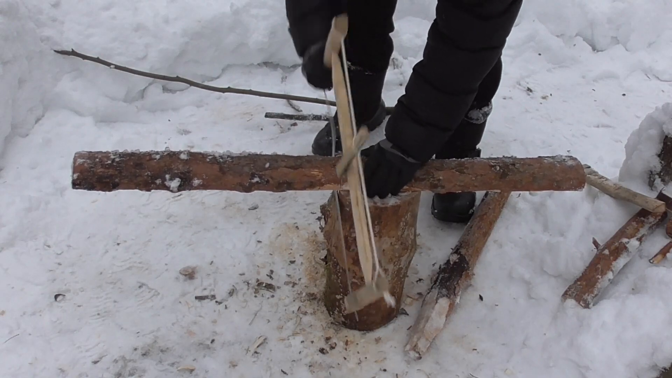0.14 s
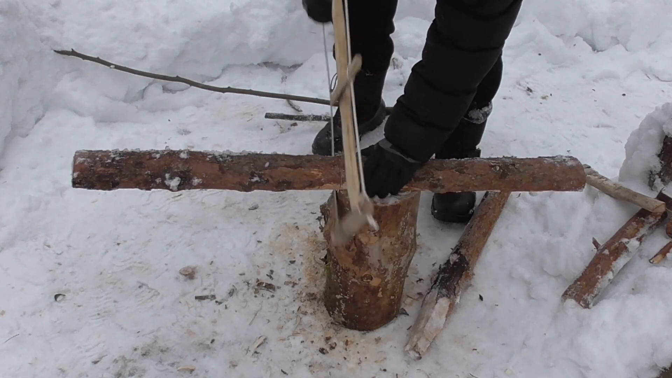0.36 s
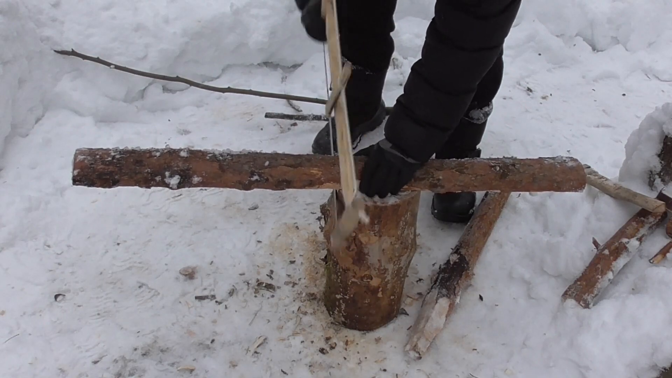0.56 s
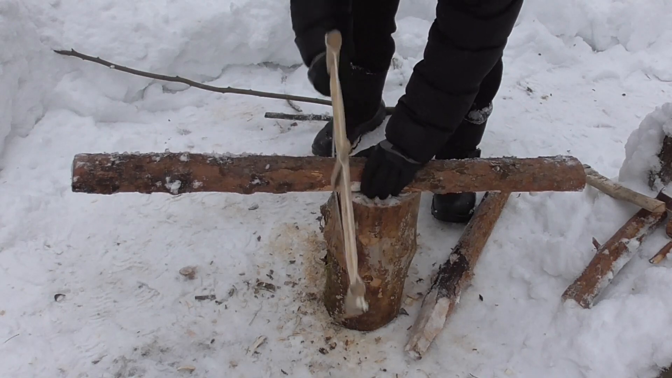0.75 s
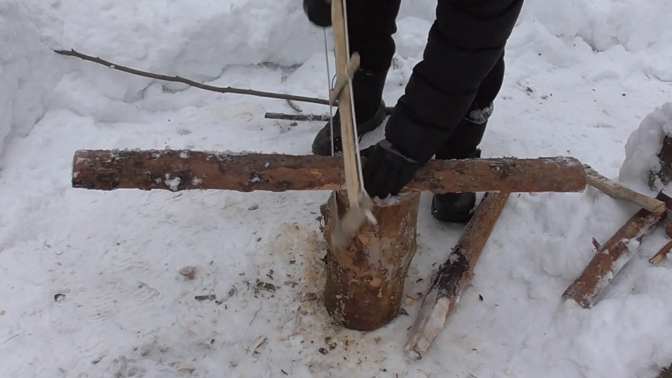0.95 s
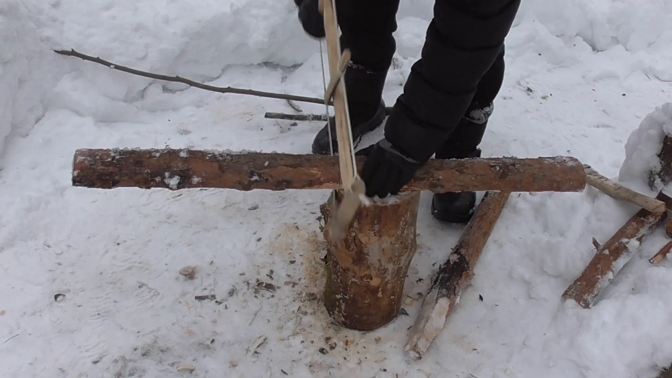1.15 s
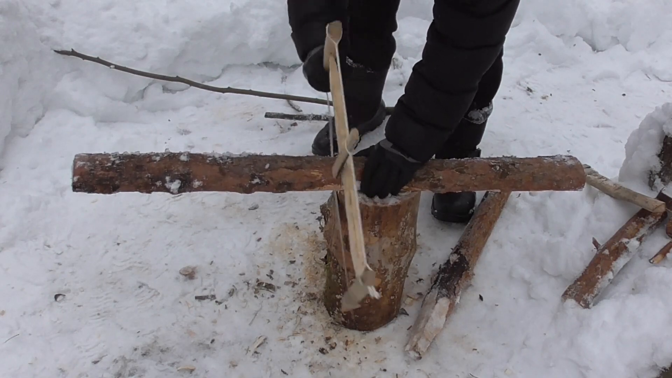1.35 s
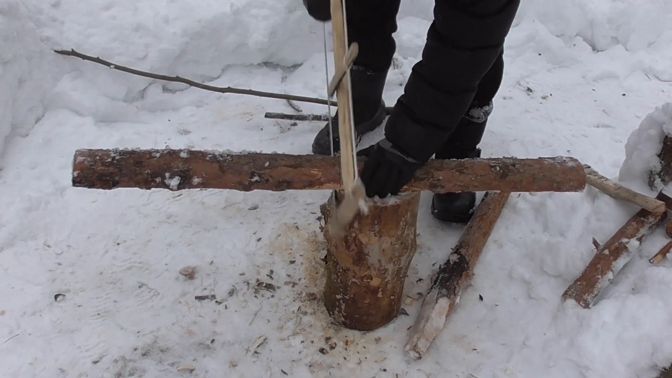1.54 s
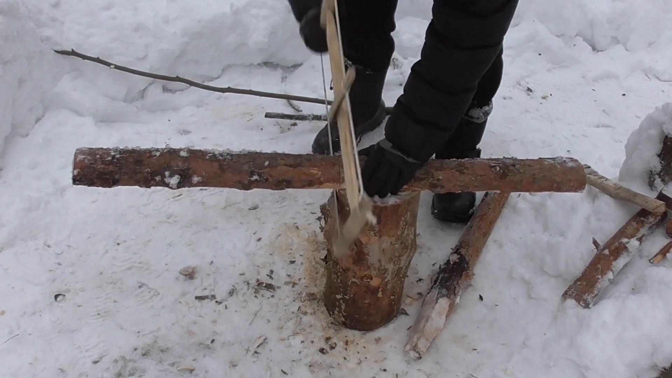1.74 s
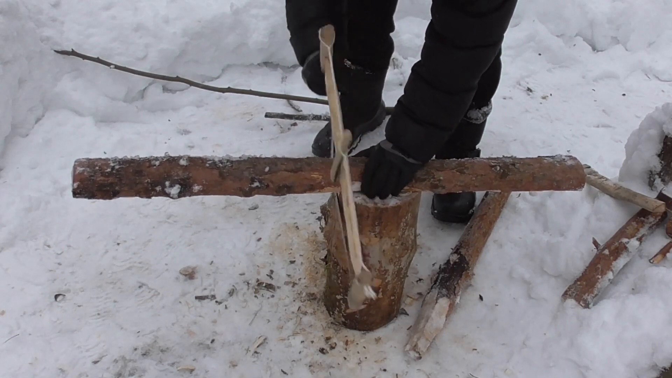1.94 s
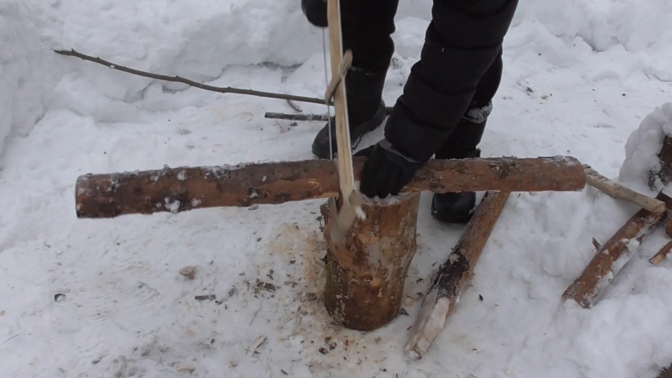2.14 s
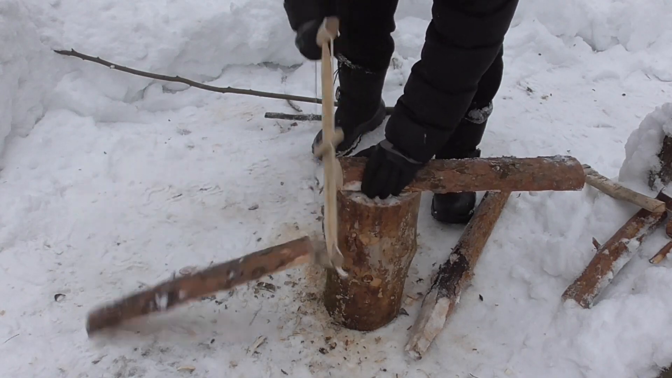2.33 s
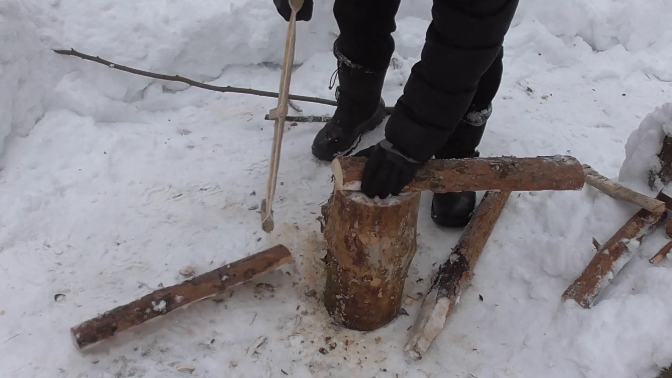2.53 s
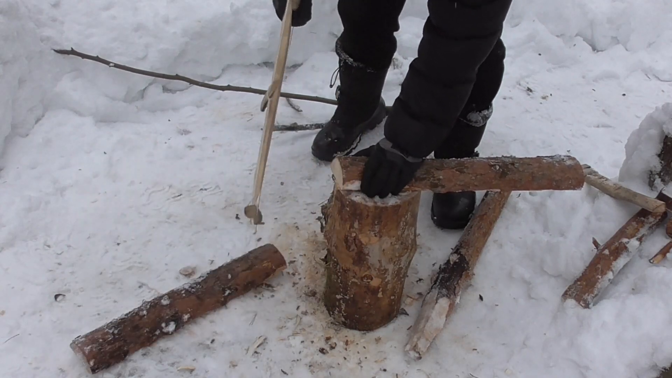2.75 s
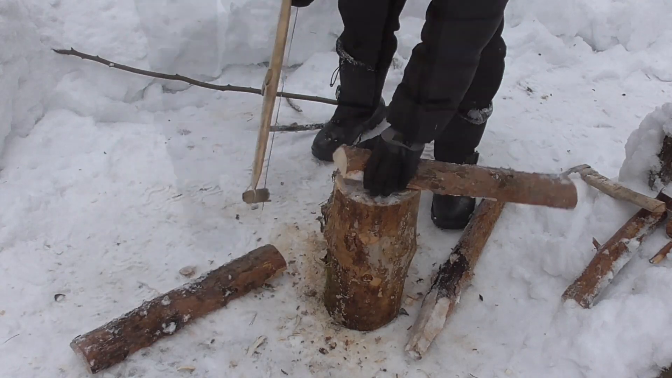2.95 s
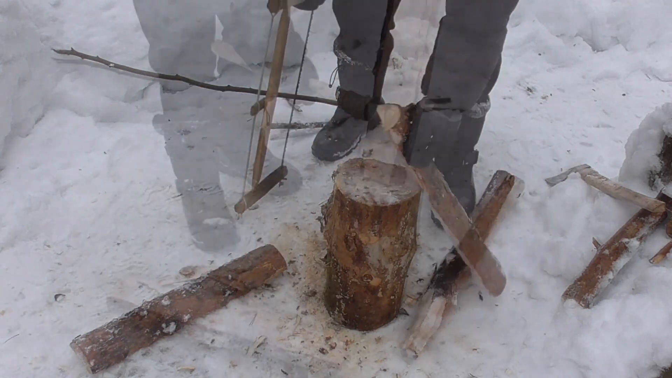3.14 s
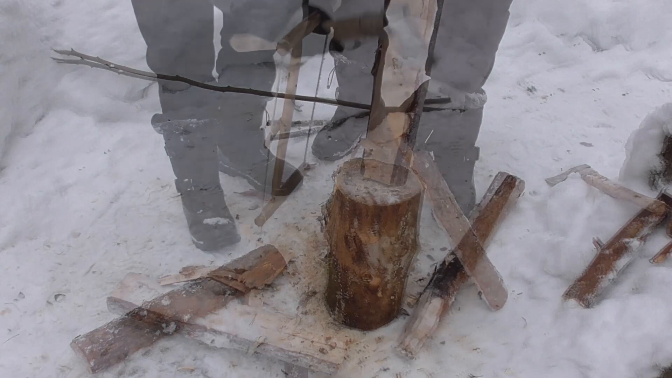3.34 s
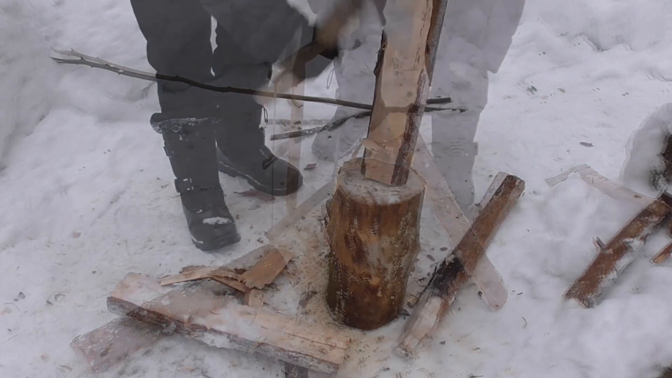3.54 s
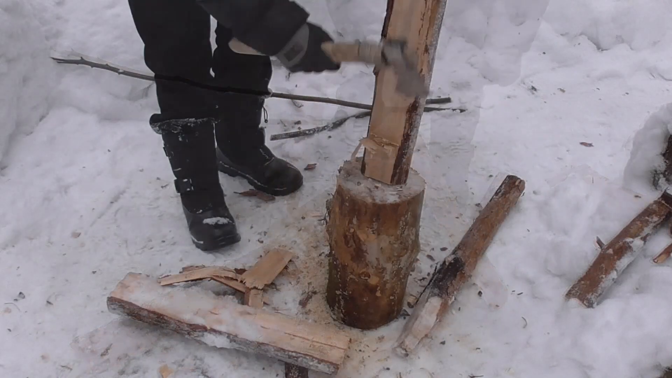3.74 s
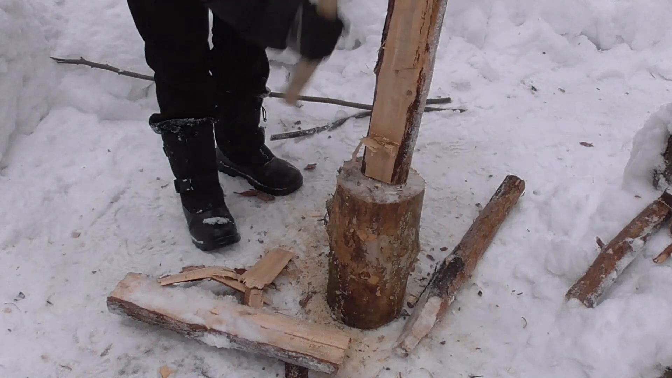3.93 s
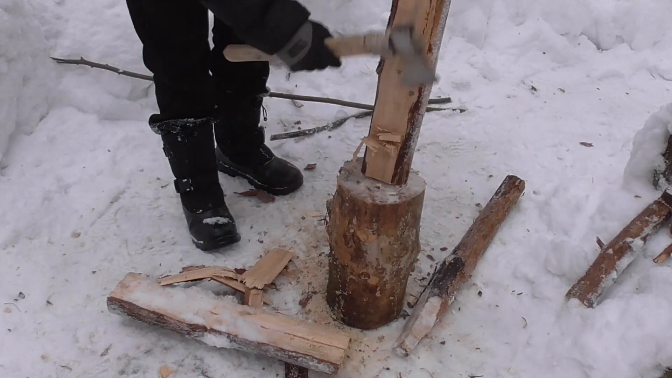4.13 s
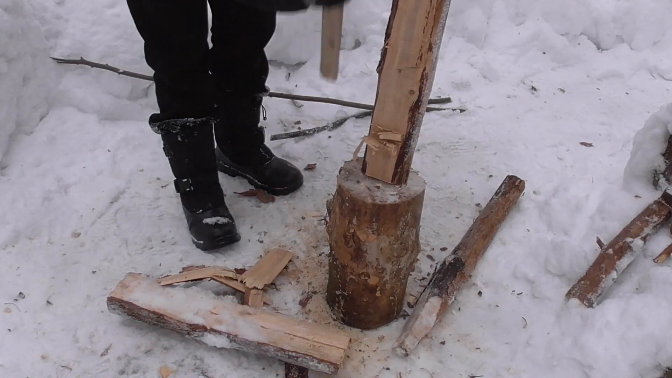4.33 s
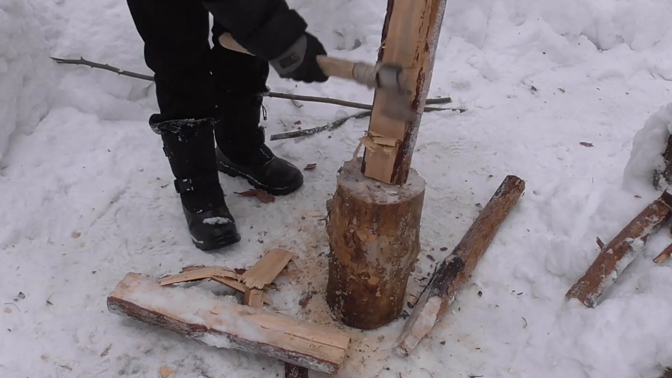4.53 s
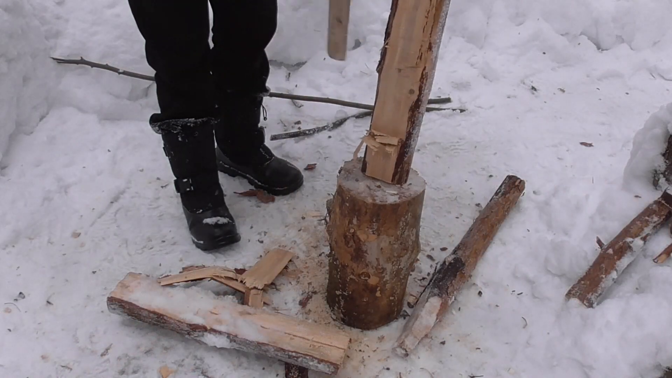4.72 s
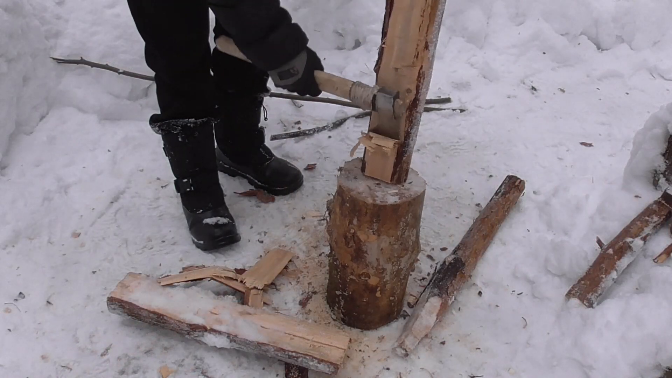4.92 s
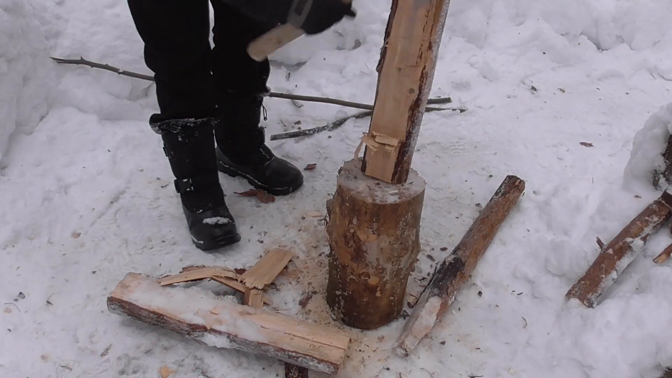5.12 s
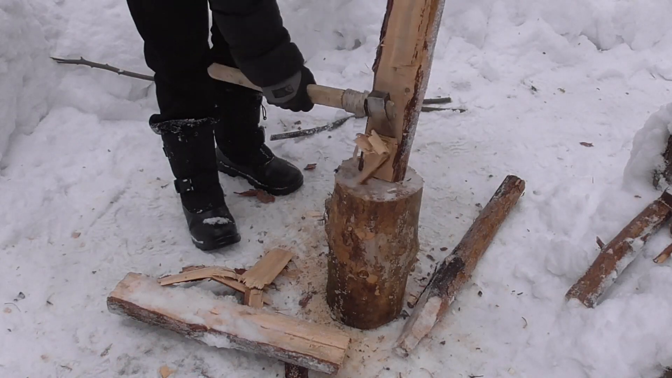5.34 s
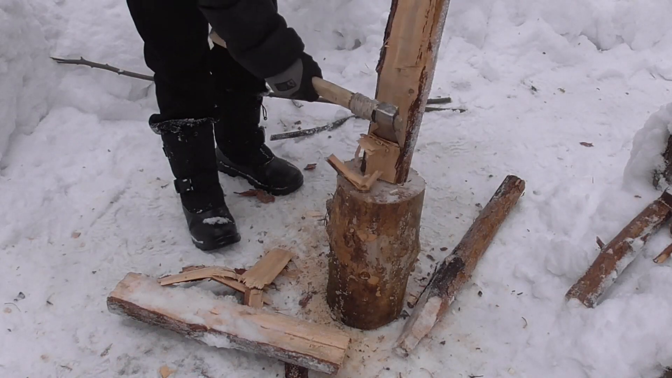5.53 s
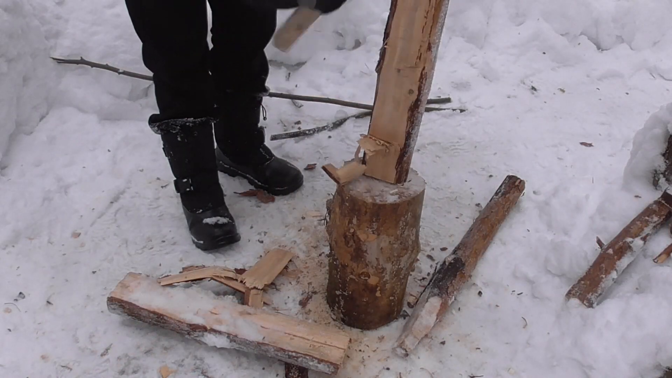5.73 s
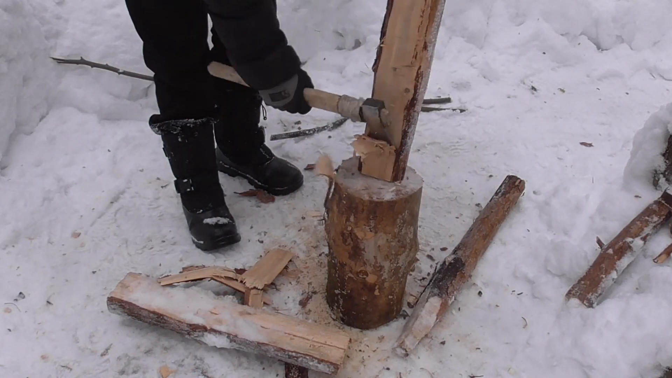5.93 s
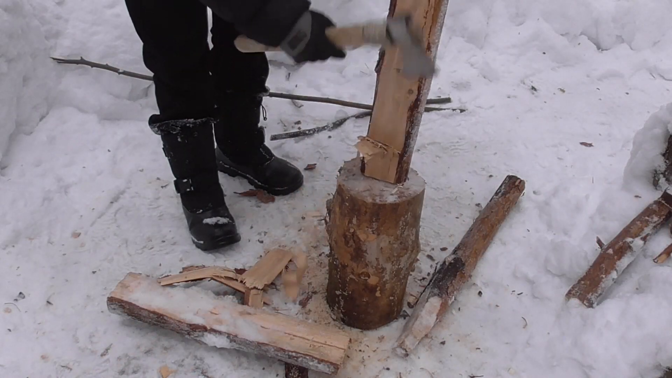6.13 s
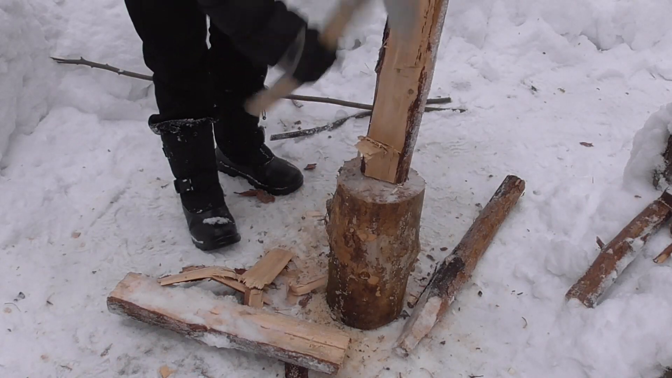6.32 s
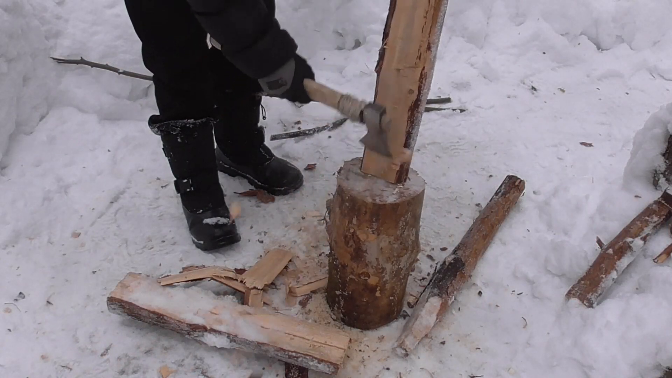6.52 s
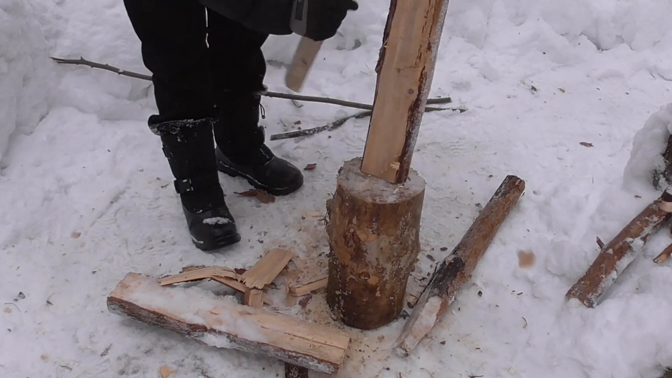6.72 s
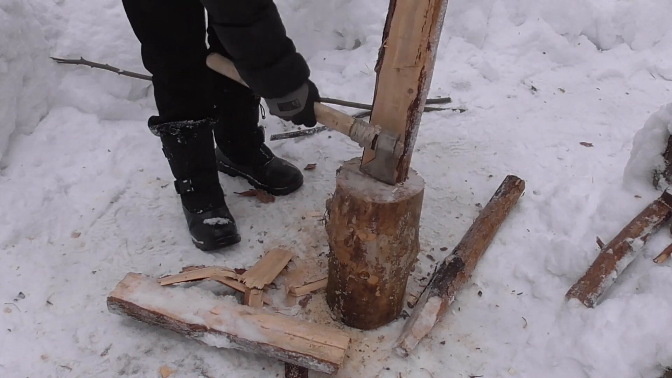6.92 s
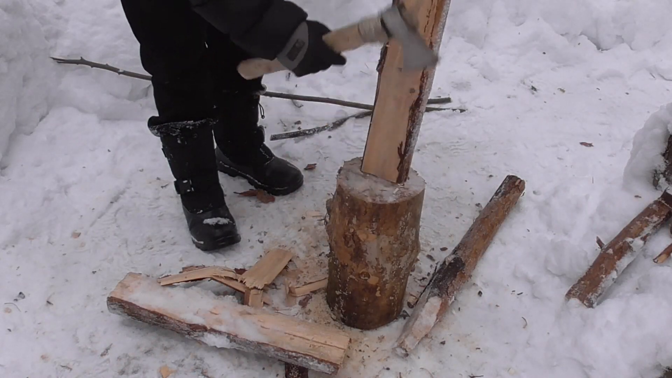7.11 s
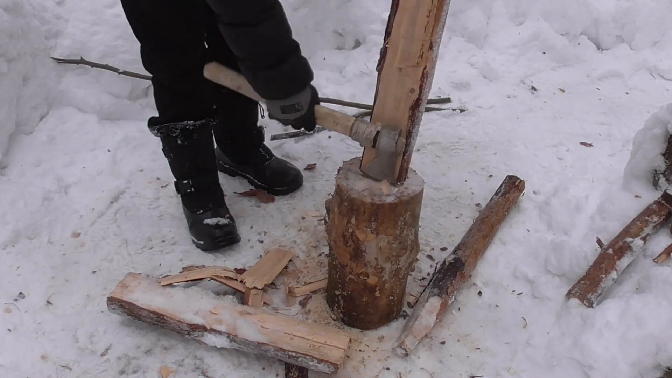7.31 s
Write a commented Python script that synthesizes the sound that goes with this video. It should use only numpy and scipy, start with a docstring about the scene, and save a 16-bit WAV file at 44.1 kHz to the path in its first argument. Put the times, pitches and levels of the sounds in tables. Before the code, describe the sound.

Heard from a few metres in a quiet, snowy forest, a hand saw cuts a log with fast, gritty back-and-forth strokes. The wood splinters and breaks, and the piece drops with a knock and a crunch of snow. Wood is bumped about, then a hatchet strikes a board on a block eight times at an even pace. The chops are sharp and nearly dry, with a faint distant echo, small falling chips and soft clothing rustle.

```python
"""A bow saw rasps through a log in quick pulls and pushes, its teeth shaking wood, frame and blade.
The last fibres snap, and at 2.5 s the end cracks off and drops in the snow. Wood is knocked about.
From 3.7 s a hatchet lands eight hard chops on a board on a block; the snow swallows nearly all echo
but a faint one from far trunks. Chips tick, and clothes and snow rustle to the end.
A small camera with two close microphone ports hears it all from a few metres."""
import sys
import numpy as np
from scipy import signal
from scipy.fft import rfft, irfft, next_fast_len
from scipy.io import wavfile
from scipy.ndimage import uniform_filter1d, map_coordinates

SR = 44100
rng = np.random.default_rng(int(sys.argv[2]) if len(sys.argv) > 2 else 0)


def put_to_file(sound):
    """Save the sound as 16-bit audio at rate SR, in the file named by the first command-line argument."""
    columns = np.atleast_2d(sound).T  # one column per channel
    safe = np.clip(columns, -1, 1)
    whole_steps = np.round(safe * 32767)
    wavfile.write(sys.argv[1], SR, whole_steps.astype(np.int16))


N = 325017

# Noise colours. Each row: frequency in Hz, level in dB.
WASH_EQ = [(20, -19), (50, -16), (110, -6), (205, -0.5), (390, -3), (760, -10.5), (1500, -22.5),
           (3000, -44)]
SWISH_EQ = [(400, -21), (800, -10), (1200, -2), (1600, -6.5), (2000, -9.5), (2600, -12.5), (3500, -14.5),
            (5000, -39)]
RUSTLE_EQ = [(1180, -36.5), (2000, -20), (4090, 0.5), (5620, -2.5), (6880, -3), (7520, 0.5), (9210, -5),
             (9980, -4.5), (10700, 1), (15500, -11.5), (16500, -44)]
TRUNK_ECHO_EQ = [(300, -21.5), (700, -10), (1100, -9.5), (1500, -4.5), (1900, -9.5), (2600, -4), (4500, -4),
                 (7000, -43)]
CRACK_EQ = [(710, -20.5), (1200, -3.5), (1900, -11), (2600, -15.5), (3400, -7.5), (4350, -6), (5890, -9.5),
            (7570, -4.5), (8360, -7.5), (11900, -6.5), (15800, -21.5), (16500, -28)]
RASP_EQ = [(180, -28.5), (300, 0.5), (531, -10.5), (717, -8), (848, -14.5), (1040, -5), (1360, -13.5),
           (1770, -45.5), (2100, -12.5), (3360, -12.5), (5100, -20), (9020, -20.5), (11600, -13.5),
           (14700, -29), (16500, -75)]
# Background faders. Each row: time in seconds, wash in dB, swish in dB.
WASH_SWISH_FADERS = [(2.36, -52, -48), (2.5, -59, -46), (2.65, -52, -56), (2.9, -60.5, -62.5),
                     (3.22, -60, -74), (3.3, -58.5, -52), (3.42, -66.5, -77.5), (3.65, -59.5, -70),
                     (6.9, -57.5, -75), (7.37, -52, -68)]
# Cloth and snow, then the chops' send to the far trunks. Each row: time in seconds, level in dB.
RUSTLE_FADER = [(2.36, -45), (2.42, -33), (2.55, -40), (2.66, -52), (2.8, -57), (2.97, -59.5), (3.2, -68),
                (3.27, -54.5), (3.37, -54.5), (3.43, -69), (3.631, -65.5), (4.3, -66.5), (4.5, -62),
                (5.3, -66.5), (5.69, -59), (5.8, -62.5), (5.92, -62), (6.199, -67.5), (6.74, -59),
                (6.87, -62.5), (7.03, -55), (7.22, -57.5), (7.37, -53)]
ECHO_SEND = [(3.66, -0.5), (4.086, 1), (4.52, 1.5), (4.959, -1.5), (5.412, -2), (6.018, 3), (6.48, -1.5),
             (6.973, 0)]
# Scatter off block, legs, snow banks and trunks. Each row: level in dB, t60 in seconds, centre in Hz.
REFLECTIONS = [(-20.5, 0.0023, 16000), (-18.5, 0.022, 238), (-22.5, 0.22, 4400)]
# Faint tones. Each row: start and end in seconds, pitch in Hz, level in dB.
FAINT_TONES = [(3.006, 3.486, 1486, -73), (4.6, 4.885, 1450, -62)]
# Splinters, chips and crumbs. Each row: start in seconds, level in dB, centre in Hz, length in seconds.
CHIP_TICKS = [(0.444, -27.5, 10340, 0.0068), (1.893, -17.5, 5190, 0.01072), (2.401, -23, 7060, 0.019),
              (2.4248, -18, 4560, 0.02), (2.461, -13, 11500, 0.011), (2.487, -18, 7120, 0.0125),
              (2.505, -15.5, 5330, 0.027), (2.526, -12, 7500, 0.008), (2.562, -11.5, 9900, 0.00417),
              (2.583, -32, 7000, 0.0068), (2.624, -29, 7860, 0.052), (2.683, -31, 7500, 0.022),
              (2.773, -26.5, 5840, 0.027), (3.159, -46.5, 6000, 0.0165), (3.178, -42, 5400, 0.017),
              (3.24, -20, 7500, 0.0049), (3.537, -37, 11800, 0.0031), (4.654, -33.5, 10760, 0.0076),
              (5.351, -42, 5460, 0.0078), (5.588, -38, 11500, 0.012), (5.6274, -34.5, 11380, 0.0074),
              (5.651, -38, 12000, 0.014), (5.7, -39.5, 10960, 0.021), (5.813, -51, 10060, 0.01),
              (5.855, -46, 11700, 0.0076), (6.151, -50.5, 8900, .02), (6.268, -30.5, 8000, 0.01),
              (6.289, -46, 9000, 0.0039), (6.359, -39, 11200, 0.0064), (6.4, -44, 8000, 0.0066),
              (6.4355, -44, 10970, 0.0096), (6.446, -41, 9000, 0.0068), (6.631, -31, 11400, 0.021),
              (6.744, -27.5, 7400, 0.01), (6.764, -23.5, 9240, 0.012), (6.7964, -35.5, 3800, 0.0097),
              (6.822, -39, 10800, 0.0061), (6.861, -40.5, 11700, 0.0082), (6.917, -39, 11450, 0.0266),
              (6.971, -20, 10500, 0.0031), (7.165, -39, 10800, 0.015), (7.211, -28.5, 11000, 0.012)]
# Ringing steel. Each row: start in seconds, pitch in Hz, level in dB, t60 in seconds.
STEEL_PINGS = [(2.4, 2680, -27, .04), (2.431, 4500, -17.5, 0.054), (2.477, 7140, -18, .03),
               (2.49, 4730, -28, 0.27), (4.5218, 4330, -13.5, 0.015)]
# Hits on wood. Each row: start in seconds, punch in dB, punch pitch in Hz, crack in dB, crack rise in
# seconds, thud in dB, ring in dB, ring centre in Hz, splinters in dB, left minus right in dB.
FIBRE_SNAPS = [(2.0766, -32, 1216, -12, 0.0009, -44, -28, 1200, -38.5, 0),
               (2.2203, -23, 1090, -9, 0.00079, -22.5, -31, 1150, -36.5, 0),
               (2.4636, -4, 756.3, -16, 0.0023, -9.5, -5.5, 847, -33, 0),
               (2.476, -31, 700, -14.5, 0.0027, -43.5, -14.5, 700, -33.5, 0),
               (2.500, -22, 1200, -17, 0.0014, -41.5, -17.5, 1200, -36.5, 0)]
LOG_KNOCKS = [(2.529, -32, 300, -38, 0.0018, -31, -36, 300, -43, 0),
              (2.541, -13.5, 246, -18.5, 0.0011, -13.5, -12.5, 302, -38, 0),
              (2.744, -51.5, 205, -36.5, 0.0048, -29, -54, 300, -51, 0.35),
              (2.783, -48.5, 1310, -33, 0.0044, -49, -37, 1290, -44, 0),
              (2.867, -46, 977, -31, 0.003, -35, -31.5, 900, -59, 0),
              (3.2436, -29, 640, -39, 0.0031, -27.5, -7.5, 750, -43, 0.28),
              (3.289, -61.5, 300, -44.5, 0.011, -39, -28, 600, -49, 0.65)]
HATCHET_CHOPS = [(3.2024, -33, 1600, -31, 0.0029, -30, -18.5, 1690, -41, -0.5),
                 (3.6598, -8.5, 1080, -18, 0.00095, -24.5, -14.5, 1150, -38, 0),
                 (4.0863, -8.5, 872, -14.5, 0.00089, -18.5, -11.5, 1540, -34, 0.5),
                 (4.5205, -5.5, 810, -16, 0.0011, -21.5, -12.5, 1150, -33, -1.5),
                 (4.9592, -6.5, 1010, -15, 0.0013, -18, -9.5, 944, -33.5, -0.5),
                 (5.4122, -3, 916, -15, 0.0015, -14, -9, 660, -34.5, -2),
                 (6.0179, -3, 1070, -17, 0.0013, -16.5, -16.5, 1400, -28, -2.5),
                 (6.0203, -6, 1220, -19.5, 0.00062, -22.5, -18, 1400, -34.5, 4),
                 (6.4805, -3.5, 1140, -13.5, 0.0012, -15, -16, 1450, -27, -0.5),
                 (6.4902, -39, 1450, -24, 0.0017, -28, -30, 1450, -38, 3),
                 (6.9731, -5, 494.4, -17, 0.0019, -40, -4.5, 560, -31.5, 0.5),
                 (6.9834, -3.5, 1120, -15, 0.00025, -45, -21.5, 1250, -27.5, -1.5)]
# Tearing log, knocked log and chopped board. Each row: pitch in Hz, level in dB, t60 in seconds.
SPLIT_MODES = [(679, 2, 0.0428), (943, -5, 0.051), (1183, 0, 0.074), (1370, 1, 0.037), (1502, 3, 0.045),
               (2010, -25, 0.027), (2600, -19, 0.014)]
LOG_MODES = [(296, -2.5, 0.015), (629, -6.5, 0.12), (669, -7.5, 0.074), (1330, -21, 0.046),
             (1430, -12.5, 0.066), (2330, -13, 0.039)]
BOARD_MODES = [(320, -8, 0.029), (517, 7, 0.017), (698, 10.5, 0.011), (1070, 1, .022), (1456, 0.5, 0.015),
               (1678, 5.5, 0.018), (2003, -2.5, 0.023), (2855, -8, 0.017), (4200, -0.5, 0.0075)]
# Pull and push in turn. Each row: turn and bite in seconds, rasp in dB, hum and frame in dB re the rasp.
SAW_STROKES = [(0, 0.073, -31, -20, -8.5), (0.153, 0.179, -26.5, -5.5, -1),
               (0.292, 0.379, -29.5, -1.5, -2.5), (0.448, 0.476, -23, -0.5, 0.5),
               (0.588, 0.666, -26.5, -5, -3), (0.743, 0.774, -23.5, 1.5, 3),
               (0.888, 0.965, -24.5, -10.5, -10), (1.042, 1.079, -25, 2, 0.5),
               (1.182, 1.255, -26.5, -11, -14.5), (1.342, 1.379, -25, 4, 0.5),
               (1.491, 1.552, -25.5, -7, -7.5), (1.641, 1.668, -24.5, 1, 0),
               (1.775, 1.871, -28.5, -8.5, -6), (1.938, 1.957, -25.5, -1, -2.5),
               (2.067, 2.137, -28, -1.5, -33), (2.235, 2.265, -19.5, -13, -12),
               (2.363, 2.477, -32, -25, -9)]
# Bending log, wood on the pull, saw frame and blade. Each row: centre in Hz, width in Hz, level in dB.
HUM_BANDS = [(273.4, 47, -3.5), (370, 120, -12)]
PULL_BANDS = [(427, 122, -2), (1301, 200, -7)]
FRAME_BANDS = [(679.4, 33, 2.5), (843, 110, 12.5), (1050, 63, 1.5), (1324, 280, 2.5)]
BLADE_BANDS = [(1464, 85, -3.5), (2060, 150, -2), (2550, 270, -14.5), (3950, 350, -12), (4850, 1220, 4),
               (6750, 290, -11.5)]
# The ports' difference in colour. Each row: frequency in Hz, left minus right in dB.
PORT_TILT = [(60, 0), (110, -1), (200, -3.5), (380, -5.5), (700, 2), (1290, 0.5), (2380, -0.5), (4400, -1),
             (8120, 0.5), (15000, -5)]
# The microphone's treble fall. Each row: frequency in Hz, gain in dB.
MIC_EQ = [(15500, 0.5), (16000, -21), (16800, -25)]

SAW_END_S = 2.57
TURNS_S = [stroke[0] for stroke in SAW_STROKES] + [SAW_END_S]
TIME = np.arange(N) / SR
OPPOSITE = np.array([[1], [-1]])  # left and right in opposite polarity


def undb(db):
    """Gain of a level in dB."""
    return 10 ** (np.asarray(db) / 20)


def unit(x):
    """Scale to rms 1."""
    return x / np.sqrt(np.mean(x ** 2))


def colour(x, points):
    """EQ through (Hz, dB) points joined on a log axis."""
    hz, db = np.transpose(points)
    size = next_fast_len(len(x))
    log_hz = np.log(np.arange(size // 2 + 1) * SR / size + 1)
    return irfft(rfft(x, size) * undb(np.interp(log_hz, np.log(hz + 1), db)), size)[:len(x)]


def band(x, hz, width):
    """Two-pole resonance, gain 1 at the centre."""
    hz = min(hz, .45 * SR)
    return signal.lfilter(*signal.iirpeak(hz, hz / width, SR), x)


def resonate(x, bands, tune=1):
    """A body's steep resonances, summed to rms 1."""
    return unit(sum(undb(db) * band(band(x, tune * hz, 2 * w), tune * hz, w) for hz, w, db in bands))


def walk(rate):
    """Smooth random wobble of rms 1, with `rate` new values a second."""
    hold = int(SR / rate)
    steps = np.repeat(rng.standard_normal(N // hold + 1), hold)
    return unit(np.tanh(uniform_filter1d(steps, hold)[:N]))


def grains(size, spread_db):
    """Crackly noise with random spikes."""
    return undb(spread_db * rng.exponential(size=size)) * rng.standard_normal(size)


def decay(t, t60):
    """Envelope that falls 60 dB in t60 seconds."""
    return undb(-60 * t / t60)


def add(out, start, x):
    """Mix x in from `start` seconds."""
    i = int(start * SR)
    out[i:i + len(x)] += x[:len(out) - i]


def background():
    """A low far-off wash, a soft swish and a finer, grainy rustle of cloth and snow."""
    wash = unit(colour(rng.standard_normal(N), WASH_EQ)) * undb(1.6 * walk(15))
    swish = unit(colour(rng.standard_normal(N), SWISH_EQ)) * undb(1.5 * walk(4.1))
    rustle = unit(colour(grains(N, spread_db=2), RUSTLE_EQ)) * undb(1.5 * walk(40))
    times, *faders = np.transpose(WASH_SWISH_FADERS)
    wash_db, swish_db = (np.interp(TIME, times, fader) for fader in faders)
    rustle_db = np.interp(TIME, *np.transpose(RUSTLE_FADER))
    return undb(wash_db) * wash + undb(swish_db) * swish + undb(rustle_db) * rustle


def faint_tones():
    """Narrow bands of noise swell and fade as wavering tones."""
    out = 0
    for start, end, hz, db in FAINT_TONES:
        progress = np.clip((TIME - start) / (end - start), 0, 1)
        swell = np.sqrt(np.sin(np.pi * progress).clip(0))
        out += undb(db) * swell * unit(band(rng.standard_normal(N), hz, 25))
    return out


def trunk_echo(chops, level_db=-29, build_s=0.03):
    """Far trunks answer each chop with a long, faint mid-range tail."""
    t = np.arange(SR) / SR
    tail = np.array([colour(noise, TRUNK_ECHO_EQ) for noise in rng.standard_normal((2, len(t)))])
    left, other = tail * decay(t, t60=1.7) * (1 - np.exp(-(t / build_s) ** 2))
    tail = np.array([left, .7 * left + .7 * other]) / np.linalg.norm(left)
    send = chops * undb(np.interp(TIME, *np.transpose(ECHO_SEND)))
    return undb(level_db) * signal.fftconvolve(send[None], tail, axes=1)[:, :N]


def scatter(x, rise_s=0.0027):
    """Short reflections off the surroundings, different left and right."""
    t, echo = np.arange(int(.3 * SR)) / SR, 0
    for db, t60, hz in REFLECTIONS:
        paths = band(rng.standard_normal((2, len(t))), hz, 1.3 * hz)
        paths *= decay(t, t60) * np.minimum(t / rise_s, 1)
        echo += undb(db) * paths / np.linalg.norm(paths, axis=1, keepdims=True)
    return signal.fftconvolve(x, echo, axes=1)[:, :N]


def chip_ticks():
    """Splinters snap, chips and snow crumbs land: bright bursts with a little low body."""
    out, t = np.zeros(N), np.arange(int(.08 * SR)) / SR
    for start, db, hz, length in CHIP_TICKS:
        noise = rng.standard_normal(len(t))
        burst = unit(band(noise, hz, 0.81 * hz)) + 0.31 * unit(band(noise, 610, 1600))
        age = 4.07 * t / length
        add(out, start, .5 * undb(db) * burst * age * np.exp(1 - age))
    return out


def steel_pings(attack_s=0.00079):
    """The freed saw blade and the hatchet's edge ring briefly."""
    out, t = np.zeros(N), np.arange(SR // 10) / SR
    for start, hz, db, t60 in STEEL_PINGS:
        envelope = decay(t, t60) * np.minimum(t / attack_s, 1)
        add(out, start, undb(db) * envelope * np.sin(2 * np.pi * hz * t))
    return out


def wood_hits(hits, modes):
    """Each hit: a graze, one punch of air, splitting fibres, a thud, ringing wood and a splintery tail."""
    out, t = np.zeros((2, N)), np.arange(int(.25 * SR)) / SR
    swell = lambda age: age * np.exp(1 - age)
    sine = lambda hz, phase=0: np.sin(2 * np.pi * hz * t + phase)
    lead = int(.003 * SR)
    for start, punch_db, hz, crack_db, rise_s, thud_db, ring_db, ring_hz, splinter_db, pan_db in hits:
        noise = unit(colour(rng.standard_normal(len(t)), CRACK_EQ))
        graze = undb(crack_db - 21) * noise[-lead:] * np.arange(lead) / lead
        punch = sine(hz) * swell(t * hz / 0.45) ** 1.43
        snap = swell(t / max(rise_s, .0003)) ** 0.89
        crack = noise * (snap + 0.016 * decay(t, 0.025) + 0.006 * decay(t, 0.078))
        thud = sine(260) * decay(t, 0.015) + 0.22 * sine(105) * decay(t, 0.018)
        ring = 0
        for mode_hz, db, t60 in modes:
            # where the hit lands decides which modes answer best
            db += rng.normal(0, 1.6) - 2.6 * np.log2(mode_hz / ring_hz) ** 2
            ring += undb(db) * sine(mode_hz, rng.normal(0, 0.71)) * decay(t, t60)
        ring *= 0.61 * np.minimum(t * hz / 1.5, 1) ** 2  # builds while the contact lasts
        splinters = unit(band(grains(len(t), spread_db=4.2), hz=1150, width=830))
        splinters *= decay(t, 0.094) * np.minimum(t / 0.0043, 1)
        hit = (undb(punch_db) * punch + undb(crack_db) * crack + undb(thud_db) * thud
               + undb(ring_db) * ring + undb(splinter_db) * splinters)
        for port, side in zip(out, (.5, -.5)):
            add(port, start - lead / SR, undb(side * pan_db) * np.r_[graze, hit])
    return out


def log_hum(shake, sag_ratio=0.77, sag_s=(1.8, 2.15)):
    """The bending log hums, crossfading to a lower pitch as the last of it is cut."""
    depth = np.interp(TIME, sag_s, (0, np.pi / 2))
    whole, cut = resonate(shake, HUM_BANDS), resonate(shake, HUM_BANDS, sag_ratio)
    return np.cos(depth) * whole + np.sin(depth) * cut


def tooth_tone(arch, start_hz=318, sag_hz_per_s=20):
    """The even row of teeth sings, highest and loudest at mid-stroke, sinking as the arm slows."""
    hz = (start_hz - sag_hz_per_s * TIME) * (1 - .24 * (1 - arch)) * (1 + 0.029 * walk(60))
    level_db = 3 + 0.88 * walk(63) + 6 * (arch - 1)
    return undb(level_db) * np.sin(2 * np.pi * np.cumsum(hz) / SR)


def frame_ring(shake):
    """The saw frame rings, wandering in pitch with its tension and flaring as each push catches."""
    wander = uniform_filter1d(walk(25), SR // 40)
    shift = 0.0228 * np.cumsum(np.gradient(wander) * SR / 40)
    ring = map_coordinates(resonate(shake, FRAME_BANDS), [np.arange(N) + shift], mode="mirror")
    for _, bite, *_ in SAW_STROKES[1::2]:
        ring *= 1 + 0.77 * np.exp(-((TIME - bite - 0.004) / 0.0035) ** 2)
    return ring


def fibre_rasp(tearing, crossovers_hz=(1700, 3200, 5500, 9000), clump_db=2.6):
    """Fibres tear in clumps, coarse and fine at their own moments, and set the blade ringing."""
    grit = unit(tearing * rng.standard_normal(N))
    # the kerf grips the blade at a moving place, so its resonances come and go
    blade = sum(undb(db + 2.2 * walk(45)) * unit(band(grit, hz, w)) for hz, w, db in BLADE_BANDS)
    torn = unit(colour(grit, RASP_EQ))
    lows = [signal.filtfilt(*signal.butter(2, hz, fs=SR), torn) for hz in crossovers_hz]
    bands = np.diff([np.zeros(N), *lows, torn], axis=0)
    return sum(undb(clump_db * walk(55)) * part for part in bands) + undb(-9.5) * blade


def stroke_pressure():
    """The rasp's envelope in dB: a pull swells and ends in a jerk; a push catches at once, then loads."""
    knots, accents_db = [], 0  # each knot: seconds, dB
    for k, (turn, bite, *_) in enumerate(SAW_STROKES):
        if k % 2:  # push
            release = TURNS_S[k + 1] - .021
            loaded = bite + 0.025 + 0.011 * turn  # a deeper cut takes longer to load
            knots += [(turn, -32.5), (bite - 0.0056, -18.5), (bite, -6), (loaded, 0), (release, 0.17)]
            accents_db += 2 * (TIME > bite) * np.exp(-np.abs(TIME - bite) / 0.0036)
        else:  # pull
            release, jerk_s = TURNS_S[k + 1] - .04, 0.00495
            knots += [(turn, -21.5), (turn + 0.008, -16), (bite, 0), (release, -4)]
            accents_db += 4.5 * np.exp(-((TIME - release + jerk_s) / jerk_s) ** 2)
    return np.interp(TIME, *np.transpose(knots + [(SAW_END_S, -32.5)])) + accents_db


def bow_saw(mid_stroke_teeth_hz=310.3, jitter=.12, tooth_spread_db=1.5):
    """Teeth bite at a rate that follows the blade speed, tearing fibres and shaking log and frame."""
    travel = np.interp(TIME, TURNS_S, np.arange(len(TURNS_S)))
    stroke = np.minimum(travel.astype(int), len(SAW_STROKES) - 1)
    arch = np.sin(np.pi * (travel % 1))  # 0 at the turns, 1 at mid-stroke
    levels = np.transpose(SAW_STROKES)[2:]
    rasp_db, hum_db, frame_db = (uniform_filter1d(db[stroke], SR // 100) for db in levels)
    pressure_db = stroke_pressure()
    hum_db += 6 * (arch - 1) - 0.05 * pressure_db  # fullest at mid-stroke
    frame_db -= 0.11 * pressure_db  # rings on a little through the turns
    teeth_passed = np.cumsum(mid_stroke_teeth_hz * (.55 + .45 * arch) * (1 + jitter * walk(200))) / SR
    tooth = teeth_passed.astype(int)
    force = undb(tooth_spread_db * rng.standard_normal(N // 50))[tooth]
    bites = force * np.diff(tooth, prepend=0)
    tearing = force * (0.5 + np.exp(-(teeth_passed % 1) / 0.2)) * undb(1.7 * walk(220))
    rasp = fibre_rasp(tearing)
    shake = unit(bites - bites.mean()) + 0.85 * unit(tearing * rng.standard_normal(N))
    pushing = uniform_filter1d(1. * (stroke % 2), SR // 50)
    hum = undb(-8 * pushing) * log_hum(shake) + pushing * tooth_tone(arch)
    frame = frame_ring(shake)
    pull_body = (1 - stroke % 2) * sum(undb(db) * unit(band(shake, hz, w)) for hz, w, db in PULL_BANDS)
    # the long blade sends the finest hiss to the two ports in opposite polarity
    hiss = undb(-12.5) * unit(band(tearing * rng.standard_normal(N), 9300, 6900)) * OPPOSITE
    envelope = undb(rasp_db + pressure_db) * np.clip((SAW_END_S - TIME) / 0.0088, 0, 1)
    return envelope * (rasp + pull_body + hiss + undb(hum_db) * hum + undb(frame_db) * frame)


def scene(phase_turn_hz=8930, mid_share=0.87):
    """Saw and wood up front, their echoes behind, over a nearly centred background."""
    saw = bow_saw()
    chops = wood_hits(HATCHET_CHOPS, BOARD_MODES)
    spots = chops + wood_hits(FIBRE_SNAPS, SPLIT_MODES) + wood_hits(LOG_KNOCKS, LOG_MODES)
    spots += chip_ticks() + faint_tones() + steel_pings()
    direct = saw + spots
    # treble reaches the left port by another path, its phase turned; more so from the long blade
    direct[0] -= 2 * band(saw[0], phase_turn_hz, 870) + 0.89 * band(spots[0], phase_turn_hz, 1724)
    reflections = scatter(undb(-8) * saw + spots)  # the blade, low over the snow, scatters less
    bed = np.sqrt(mid_share) * background() + np.sqrt(1 - mid_share) * background() * OPPOSITE
    return bed + trunk_echo(chops.mean(axis=0)) + reflections + direct


def gain_control(x, threshold_db=-12, recovery_db_per_s=22, lag_s=0.012):
    """Peaks duck the gain a moment late; it climbs back at a steady rate."""
    over_db = np.maximum(20 * np.log10(np.abs(x).max(axis=0) + 1e-9) - threshold_db, 0)
    climb_db = recovery_db_per_s * TIME
    cut_db = np.maximum.accumulate(over_db + climb_db) - climb_db
    step = 1 / (lag_s * SR)
    for _ in range(2):
        cut_db = signal.lfilter([step], [1, step - 1], cut_db)
    return x * undb(-cut_db)


def record(dry, bass_cut_hz=90, top_hz=17000):
    """The ports differ in colour; the camera cuts the bass, rides its gain and cuts the top."""
    ports = np.array([colour(colour(port, MIC_EQ), np.array(PORT_TILT) * [1, side])
                      for port, side in zip(dry, (.5, -.5))])
    ports = signal.sosfilt(signal.butter(2, bass_cut_hz, "high", fs=SR, output="sos"), ports)
    return signal.sosfilt(signal.ellip(10, .3, 80, top_hz, fs=SR, output="sos"), gain_control(ports))


dry = scene()
out = record(dry)
put_to_file(out)
```